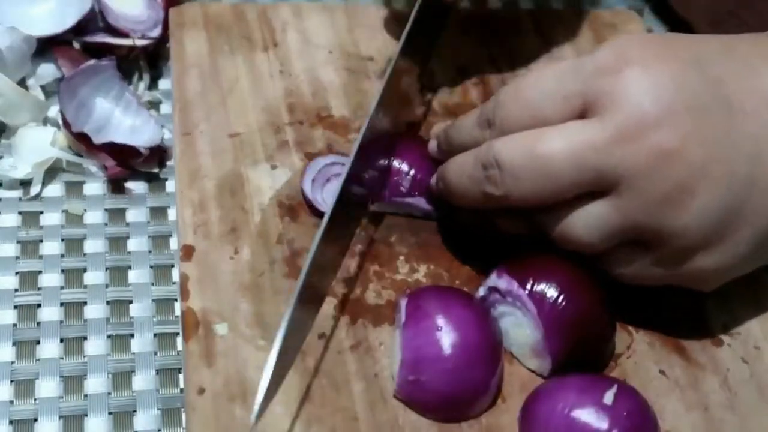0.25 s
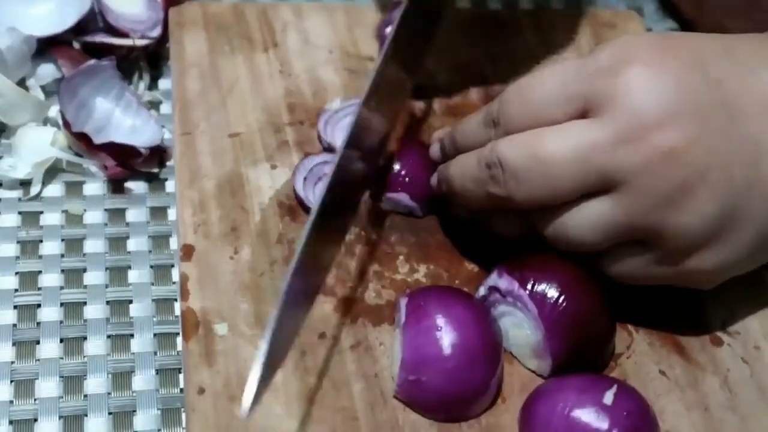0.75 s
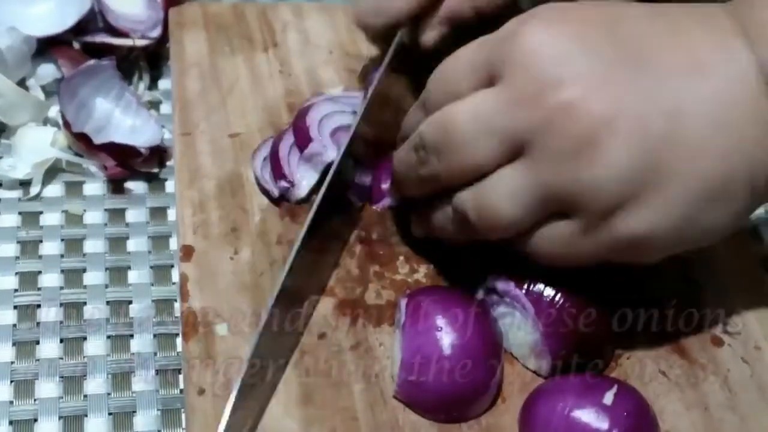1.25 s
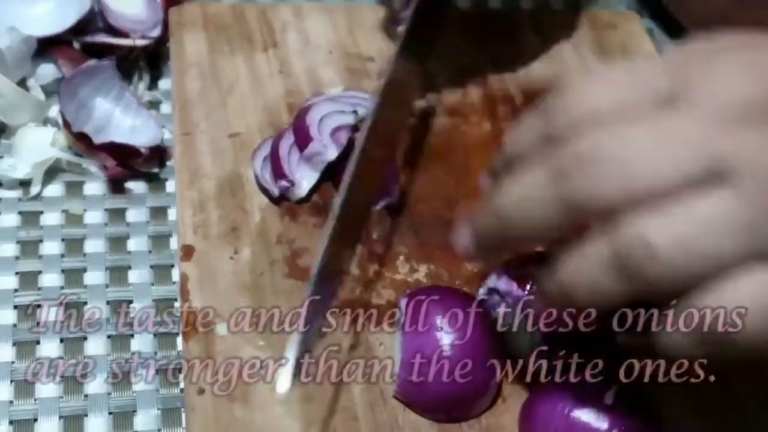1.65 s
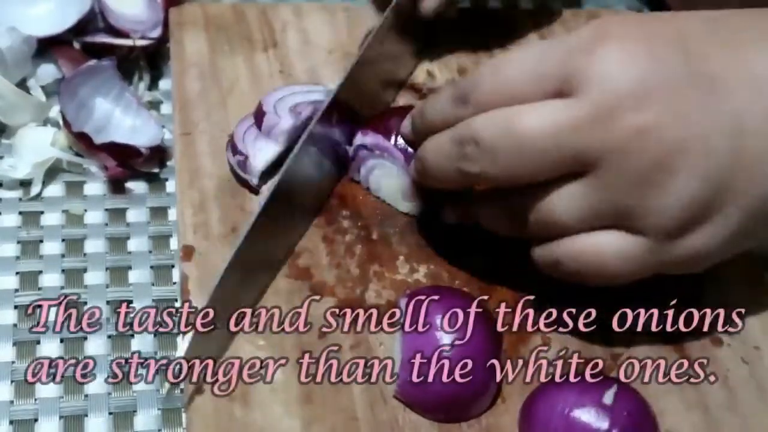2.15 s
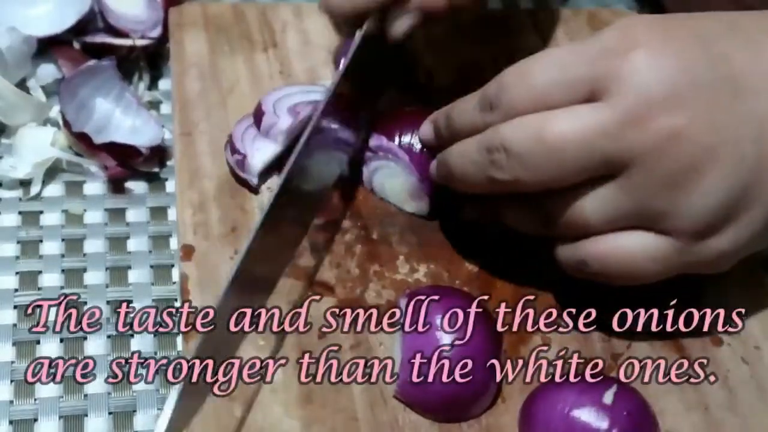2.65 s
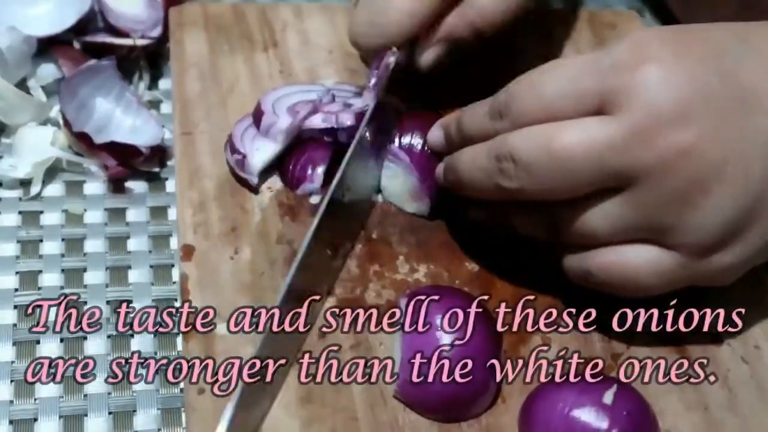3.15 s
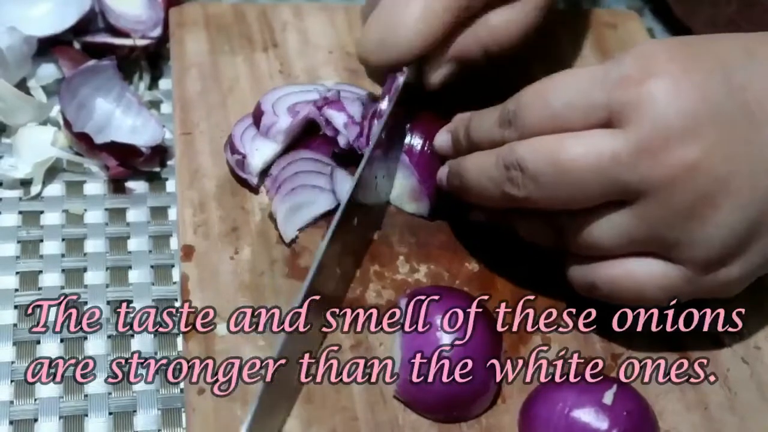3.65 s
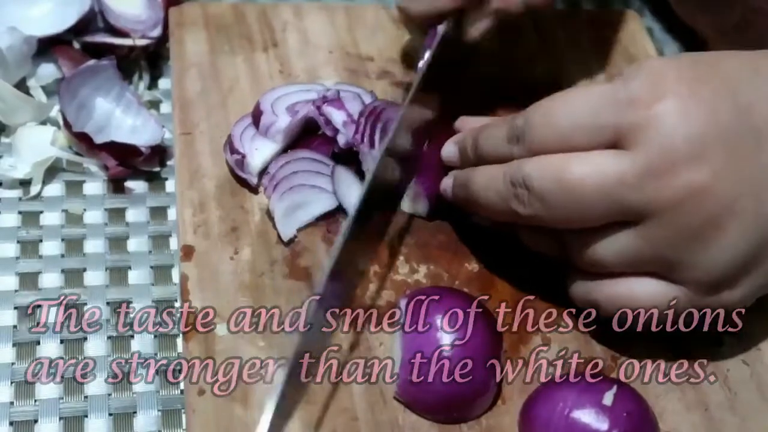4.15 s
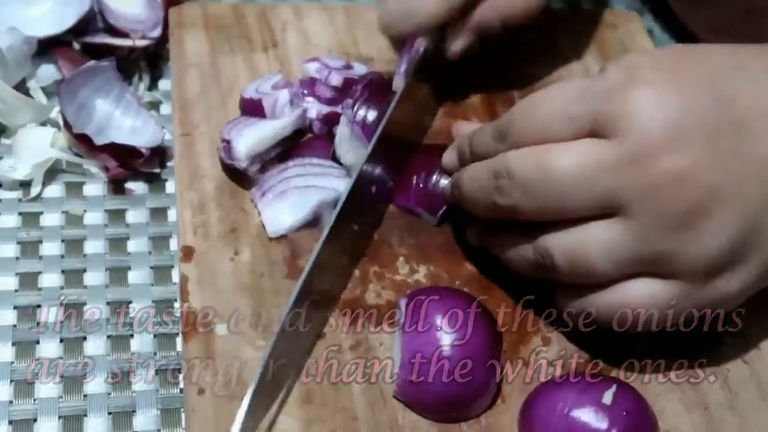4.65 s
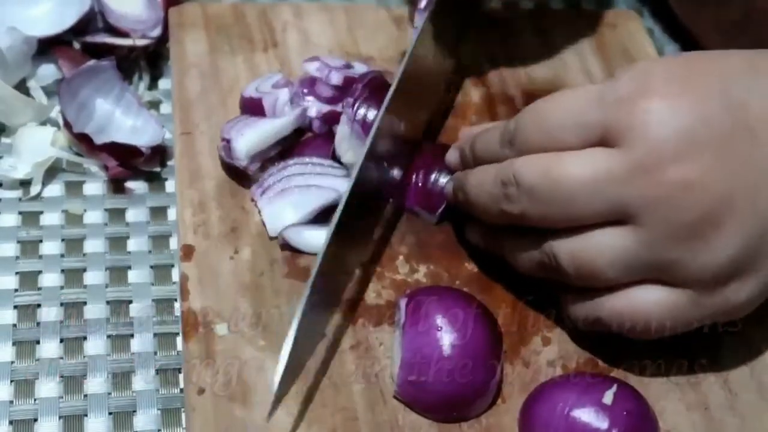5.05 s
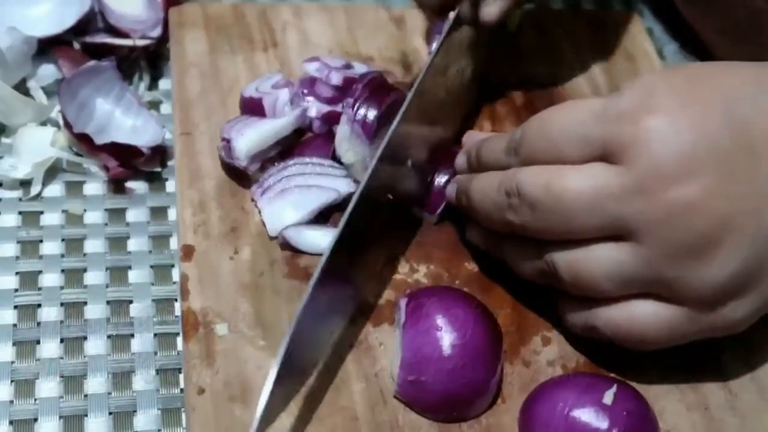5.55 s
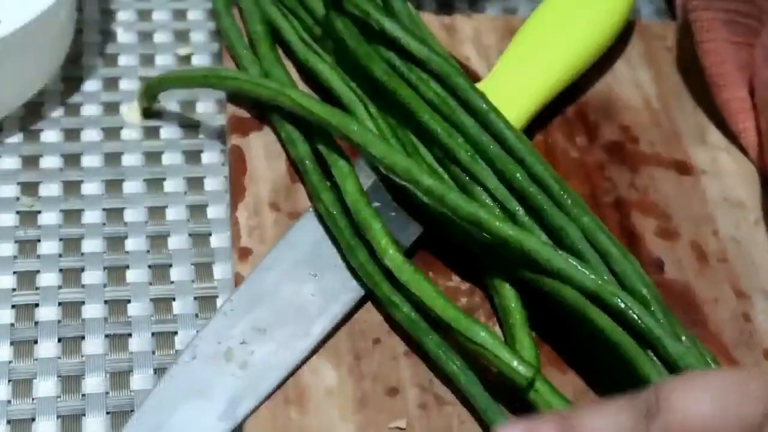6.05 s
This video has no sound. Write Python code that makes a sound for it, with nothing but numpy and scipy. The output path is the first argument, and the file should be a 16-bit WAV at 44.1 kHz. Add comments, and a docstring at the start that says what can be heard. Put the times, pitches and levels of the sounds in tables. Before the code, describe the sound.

A knife slices an onion on a wooden board, about three wet crunches and knocks a second, over a low room rumble.

```python
"""In a kitchen, close to the microphone, a knife slices an onion on a wooden board, about three cuts a second.
The blade crunches through wet flesh and snaps the layers, while its push makes the board thud.
Then the edge knocks on the wood and drags along it, which sets board and blade ringing.
A low room rumble and a soft hiss lie underneath, and the walls add a faint echo."""
import sys
import numpy as np
from scipy import signal
from scipy.fft import rfft, irfft
from scipy.io import wavfile
from scipy.ndimage import uniform_filter1d

SR = 44100
rng = np.random.default_rng(int(sys.argv[2]) if len(sys.argv) > 2 else 0)


def to_wav(s):
    """Save 16-bit WAV."""
    ch = np.atleast_2d(s).T  # columns
    pcm = np.round(np.clip(ch, -1, 1) * 32767)  # PCM
    wavfile.write(sys.argv[1], SR, pcm.astype(np.int16))


N = 277314
HZ = np.fft.rfftfreq(4096, 1 / SR)  # the pitches at which a tone colour is set


def amp(db):
    """Turns decibels into a number to multiply a sound by."""
    return 10 ** (np.asarray(db) / 20)


def evened(x):
    """Scales a sound to an average (rms) level of 1."""
    return x / np.sqrt(np.mean(x ** 2) + 1e-20)


def leveled(x, db, length):
    """Gives a sound the energy of the level db held for length seconds."""
    return amp(db) * x * np.sqrt(length * SR / np.sum(x ** 2))


def read(points, hz):
    """Looks up a pitch in a table, gliding between its rows."""
    pitches, values = np.transpose(points)
    return np.interp(np.log(hz + 1), np.log(pitches + 1), values)


def add(mix, start, sound):
    """Mixes a sound in, start seconds from the beginning."""
    part = mix[max(round(start * SR), 0):][:len(sound)]
    part += sound[:len(part)]


def colour(x, db):
    """Turns each pitch in HZ up or down by db, without smearing the sound back in time."""
    log_gain = np.log(amp(np.maximum(db, db.max() - 100)))
    mirrored = np.r_[log_gain, log_gain[-2:0:-1]]
    response = np.fft.ifft(np.exp(np.conj(signal.hilbert(mirrored)))).real
    return signal.fftconvolve(x, response)


def tilt(slope, low_hz=870, high_hz=4500):
    """A harder contact has more treble: a slope in dB per octave between two pitches."""
    return slope * np.log2(np.clip(HZ, low_hz, high_hz) / low_hz)


def bump(hz, db, octaves):
    """A smooth boost around one pitch, in dB."""
    return db * np.exp(-(np.log2((HZ + 1) / hz) / octaves) ** 2)


def grains(length, per_s, spread_db, fade_db, taper=0.17):
    """A short, fading run of tiny uneven clicks over a fine fizz."""
    n = max(int(length * SR), 64)
    chance, size, sign = rng.random((3, SR // 8))[:, :n]
    strength = amp(spread_db * np.minimum(-np.log(1 - size), 3))
    clicks = (chance < per_s / SR) * strength * np.sign(sign - .5)
    fizz = 0.027 * (sign - .5)
    fade = amp(-fade_db * np.linspace(0, 1, len(clicks)))
    return (clicks + fizz) * signal.windows.tukey(len(clicks), taper) * fade


# tone colour of the room noise: (pitch [Hz], level [dB])
NOISE_COLOUR = [(12, -68), (20, -23), (48, 4.5), (86, -11), (134, -5), (204, -6), (270, -2), (388, -12.5),
                (718, -12.5), (1000, -19.5), (1760, -24), (2320, -25.5), (2670, -26), (8650, -52.5),
                (16000, -73.5)]
# low notes the room hums at: (pitch [Hz], spread to each side [Hz], highest level [dB])
ROOM_HUMS = [(55, 7.7, -55.5), (156, 30, -45), (276, 25, -52.5)]
# the recorder turns the background noise down after many cuts, then lets it creep back:
# (time [s], level [dB])
RECORDER_NOISE_LEVEL = [(0, -55), (.95, -54.5), (1.4, -47), (1.8, -50.5), (2.32, -46.5), (2.46, -57),
                        (2.8, -46.5), (2.95, -54.5), (3.55, -55), (3.85, -51.5), (4.12, -51), (4.4, -50),
                        (4.85, -50.5), (5.08, -48.5), (5.4, -48), (5.56, -56), (5.84, -49), (6.29, -49.5)]
def room_noise(rumble_db=5, hiss_db=-2.0, split_hz=800, dip_db=-1.5, dip_after_s=0.14, dip_width_s=.06):
    """The room's steady rumble, hiss and hum, which the recorder turns down and back up at set times."""
    hz, t = np.fft.rfftfreq(N, 1 / SR), np.arange(N) / SR
    dips = sum(np.exp(-((t - start - dip_after_s) / dip_width_s) ** 2) for start, *_ in ONION_CUTS)
    level_db = np.interp(t, *np.transpose(RECORDER_NOISE_LEVEL)) + dip_db * dips
    noise = rfft(rng.standard_normal(N)) * amp(read(NOISE_COLOUR, hz))
    low_share = 1 / (1 + (hz / split_hz) ** 6)
    rumble = evened(irfft(noise * low_share, N)) * amp(rumble_db)
    hiss = evened(irfft(noise * (1 - low_share), N)) * amp(hiss_db)
    hum = np.zeros(N)
    for pitch, spread, db in ROOM_HUMS:
        band = rfft(rng.standard_normal(N)) / (1 + ((hz - pitch) / spread) ** 2)
        hum += amp(db) * evened(irfft(band, N))
    return (rumble + hiss) * amp(level_db) + hum * amp(level_db - level_db.max())


# how long the echo lasts: (pitch [Hz], time to fade by 60 dB [s])
ECHO_TIMES = [(100, 0.31), (1000, 0.17), (2300, 0.14), (3500, 0.17), (10000, 0.14)]
def wall_echo(x, dull_hz=2800, rise_s=0.0035):
    """The walls send back a dull echo in which each pitch dies at its own speed."""
    hz, t, noise = signal.stft(rng.standard_normal(SR // 2), SR, nperseg=256)
    fade = amp(-60 * t / read(ECHO_TIMES, hz)[:, None])
    treble_loss = 1 + (hz[:, None] / dull_hz) ** 6
    tail = signal.istft(noise * fade / treble_loss, SR, nperseg=256)[1]
    tail *= 1 - np.exp(-np.arange(len(tail)) / SR / rise_s)
    return signal.fftconvolve(x, tail / np.linalg.norm(tail))[:N]


def board_thuds(push_hz=76, bounce_hz=131, swell_turns=0.29, table_hz=46, table_db=-11, table_s=0.0086):
    """The board gives under each cut and landing and swings back; the table below sways more slowly."""
    out, t = np.zeros(N), np.arange(SR // 6) / SR
    sway = amp(table_db) * t / table_s * np.exp(1 - t / table_s) * np.sin(2 * np.pi * table_hz * t)
    # the board sags just after a cut begins, and bounces as the edge arrives
    pushes = [(start + 0.0083, db, push_hz) for start, _, _, _, db in ONION_CUTS]
    bounces = [(start - 0.0011, db, bounce_hz) for start, _, _, db, *_ in KNIFE_LANDINGS]
    for start, db, hz in pushes + bounces:
        swell = hz * t / swell_turns
        add(out, start, -amp(db) * swell * np.exp(1 - swell) * np.sin(2 * np.pi * hz * t))
        add(out, start - 0.0071, amp(db) * sway)
    return out


# the notes of board and blade: (pitch [Hz], level [dB], time to fade by 60 dB [s])
BOARD_NOTES = [(153.4, -17.5, 0.083), (306, -19.5, 0.065), (500, -18.5, 0.028), (883.5, -3, 0.039),
               (1005, -8.5, 0.04), (1127, -6.5, 0.035), (1320, -6, 0.019), (1448, -11.5, 0.025),
               (1637, -4, 0.018), (1888, -7.5, 0.033), (2093, -2.5, 0.021), (2247, 7.5, 0.015),
               (2386, 2.5, 0.0096), (2734, -6, 0.016), (3677, -4.5, 0.0082), (4730, -8, 0.0049),
               (5680, -15, 0.016), (6710, -15.5, 0.0097), (8260, -14, 0.0058), (10300, -25.5, 0.0098),
               (13100, -30, .008)]
def board_ring(rise_s):
    """Board and blade ring with many short notes; neighbouring notes swing in opposite directions."""
    t = np.arange(SR // 10) / SR
    ring = sum((-1) ** k * amp(db - 60 * t / fade_s) * np.sin(2 * np.pi * hz * t)
               for k, (hz, db, fade_s) in enumerate(BOARD_NOTES))
    return ring * (1 - np.exp(-t / rise_s))


# tone colour of the edge rubbing on wood: (pitch [Hz], level [dB])
RUB_COLOUR = [(100, 10), (900, -0.5), (2400, -2.5), (3000, -10), (4500, -12.5), (6000, -27.5),
              (12000, -33.5)]
def knife_drags(damping_db_per_s=400, lag_s=0.003014, extra_bright=1):
    """After each landing the edge sticks and slips on the wood, which keeps the board ringing."""
    out, ring = np.zeros(N), board_ring(rise_s=0.00077)
    ring *= amp(-damping_db_per_s * np.arange(len(ring)) / SR)
    for start, _, hardness, _, length, db, hz in KNIFE_LANDINGS:
        slips = grains(length, per_s=1700, spread_db=2.5, fade_db=8.0)
        scrape = signal.fftconvolve(slips, ring)
        tone = read(RUB_COLOUR, HZ) + tilt(hardness + extra_bright) + bump(hz, db=3.5, octaves=0.13)
        add(out, start + lag_s, leveled(colour(scrape, tone), db, length))
    return out


# the edge lands on the board, less hard when onion cushions it: (time [s], knock level [dB],
# hardness [dB per octave], thud level [dB], drag length [s], drag level [dB], pitch of that spot [Hz])
KNIFE_LANDINGS = [(.12, -24, -1.5, -30.5, 0.037, -32, 1400), (.458, -21, -1, -20.5, 0.041, -31, 1300),
                  (0.7429, -14.5, -3, -34.5, 0.033, -30, 1570), (1.0478, -10, -16, -24, 0.029, -25, 1010),
                  (1.3408, -8, -5.5, -20.5, 0.013, -38, 2200), (1.6315, 3, 0, -22.5, 0.033, -19, 2330),
                  (1.8178, -11, -9.5, -38, 0.011, -43.5, 910), (2.208, -33, -3.5, -47, 0.03, -34.5, 1430),
                  (2.379, -27, 3.5, -41, 0.036, -25, 2000), (2.685, -32, -17, -22.5, 0.041, -29.5, 970),
                  (2.884, -24, 0.5, -15, 0.042, -35, 1900), (3.2, 1, 3.5, -35, 0.0037, -37.5, 2200),
                  (3.4664, 8, 0.5, -18.5, .005, -25, 2250), (3.7213, -17.5, -27.5, -16, 0.023, -49, 874),
                  (3.968, 7.5, 2.5, -29.5, 0.017, -10, 2340), (4.268, -20, -17, -34.5, 0.021, -27, 980),
                  (4.605, -13, -5.5, -34, 0.03, -28, 1514), (4.753, 1, -10.5, -16, 0.021, -20.5, 1087),
                  (4.9668, -6, -17.5, -13.5, 0.028, -29, 950),
                  (5.497, -27.5, -14.5, -43, 0.049, -39.5, 1120), (5.739, -9, -3, -19, .004, -33.5, 1720)]
def knife_knocks(bite_db=-15, fizz_s=0.0049, fizz_lead_s=0.0029, fizz_db=-34, fizz_bright=7.1):
    """The edge strikes the board and bites into the wood; a brief, faint fizz comes just before."""
    out, ring = np.zeros(N), board_ring(rise_s=0.0012)
    t = np.arange(len(ring)) / SR
    for start, db, hardness, _, drag_s, _, hz in KNIFE_LANDINGS:
        fizz = flesh_crunch(fizz_s, hardness + fizz_bright)
        add(out, start - fizz_lead_s, leveled(fizz, db + fizz_db, fizz_s))
        bite = grains(0.0081, per_s=5200, spread_db=19.0, fade_db=30.0)
        bite = colour(bite, read(FLESH_COLOUR, HZ) + tilt(1.1, high_hz=14000))
        damping_db_per_s = 201 + 2001 * np.exp(-drag_s / 0.0037)  # a blade stopping dead chokes the ring
        knock = ring * amp(-damping_db_per_s * t)
        knock /= abs(knock).max()
        add(knock, 0, amp(bite_db) * bite / abs(bite).max())
        knock = colour(knock, tilt(hardness, high_hz=7000) + bump(hz, db=2.5, octaves=0.18))
        add(out, start, amp(db) * knock / abs(knock).max())
    return out


# tone colour of breaking onion: (pitch [Hz], level [dB])
FLESH_COLOUR = [(60, 13), (280, 3), (500, -7), (720, -6), (890, 10), (1350, -4.5), (2250, 4.5),
                (2650, -3.5), (3600, -5), (4600, -12), (6800, -20.5), (9000, -29.5), (13000, -40),
                (16000, -78.5)]
def flesh_crunch(length, bright, clump_db=6, clump_s=0.0043, cell_hz=3800, cell_db=5, patch_db=5):
    """Onion cells burst in clumps; four patches of flesh each crackle with a colour of their own."""
    out = 0
    for hz in cell_hz * 2 ** rng.uniform(-.3, .3, 4):
        cells = grains(length, per_s=800, spread_db=1.5, fade_db=9.5, taper=0.34)
        clumps, ripples = np.clip(rng.standard_normal((2, 40)), -1.5, 1.5)
        t = np.arange(len(cells)) / SR
        cells *= amp(clump_db * np.interp(t / clump_s, np.arange(len(clumps)), clumps))
        patch = patch_db * np.interp(HZ, np.linspace(0, HZ[-1], len(ripples)), ripples)
        patch *= np.minimum(HZ / cell_hz, 1)  # patches differ mostly in the treble
        tone = read(FLESH_COLOUR, HZ) + tilt(bright) + bump(hz, db=cell_db, octaves=0.17)
        out = out + colour(cells, tone + patch)
    return out


def layer_crack(db, bright, pitch_hz=3444, snap_s=0.0026, splinter_db=-12):
    """A breaking layer makes one sharp click with a few splinters."""
    splinters = grains(.007, per_s=5400, spread_db=-0.5, fade_db=14.5)
    burst = amp(splinter_db) * splinters / abs(splinters).max()
    burst[0] += .6  # the click
    tone = read(FLESH_COLOUR, HZ) + tilt(bright) + bump(pitch_hz, db=10.5, octaves=0.44)
    return leveled(colour(burst, tone), db, snap_s)


# a thick layer breaks: (time [s], level [dB], brightness [dB per octave])
LAYER_SNAPS = [(.438, -25, -5), (.459, -20, -2.5), (1.0229, -30, -2), (1.041, -31, -3.5),
               (1.340, -17.5, -1), (1.8197, -29, -5), (2.6646, -22, -4), (2.869, -19.5, 4),
               (2.8845, -13.5, -0.5), (2.898, -22, -7), (3.175, -17.5, -0.5), (3.682, -24.5, -2),
               (3.711, -25.5, -2.5), (3.936, -23, -1), (4.2464, -22.5, -1.5), (4.949, -15, -4),
               (5.2445, -17.5, -.5), (5.2488, -17.5, 0.5), (5.4871, -11.5, 0.5), (5.7393, -19.5, 2.5),
               (5.758, -16, 1)]
# the blade goes through the flesh:
# (time [s], length [s], level [dB], brightness [dB per octave], push on the board [dB])
ONION_CUTS = [(0.088, 0.047, -33.5, -1.5, -31), (0.433, 0.045, -33.5, 0.5, -22),
              (0.704, 0.049, -36, 0, -38), (1.018, 0.069, -46.5, 4.5, -26), (1.32, 0.04, -30, -3, -38),
              (1.581, 0.054, -41.5, 1.5, -38), (2.2, 0.051, -44.5, 6, -44), (2.355, 0.032, -33.5, 2, -34.5),
              (2.655, 0.045, -34.5, 4.5, -22), (2.866, 0.036, -31, 5, -20.5), (3.17, .042, -28, 4, -30),
              (3.405, 0.048, -34, 1, -28), (3.681, 0.065, -34.5, -0.5, -28.5),
              (3.923, .06, -31, -0.5, -24.5), (4.21, 0.069, -34, -0.5, -29.5),
              (4.74, 0.031, -28, -2, -36.5), (4.943, .039, -31, 3, -43), (5.22, 0.059, -36, 1.5, -28.5),
              (5.456, 0.043, -31.5, 0, -30), (5.741, 0.021, -29.5, 1, -28)]
def onion_cuts(prick_s=0.0088, prick_lead_s=.021, prick_db=-17.5, juice_db=-21, juice_s=0.035):
    """The edge pricks the skin, the flesh crunches, layers break, and the wet faces crackle on."""
    out = np.zeros(N)
    for start, length, db, bright, _ in ONION_CUTS:
        prick = flesh_crunch(prick_s, bright + 2)
        add(out, start - prick_lead_s, leveled(prick, db + prick_db, prick_s))
        add(out, start, leveled(flesh_crunch(length, bright), db, length))
        for _ in range(2):  # two thin layers give way at random moments
            moment = start + rng.uniform(0, length)
            add(out, moment, layer_crack(db + rng.uniform(-1.5, 4.5), bright))
        juice = grains(juice_s, per_s=500, spread_db=4.0, fade_db=9.0, taper=.1)
        juice = colour(juice, read(FLESH_COLOUR, HZ) + tilt(3.2))
        add(out, start + length, leveled(juice, db + juice_db, juice_s))
    for start, db, bright in LAYER_SNAPS:
        add(out, start, layer_crack(db, bright))
    return out


# how wide the room sounds; low notes are alike on both sides: (pitch [Hz], side level against middle [dB])
ROOM_WIDTH = [(60, -38.5), (110, -27.5), (200, -24), (380, -7.5), (700, -13.5), (1290, -8), (2380, -9.5),
              (4400, 0.5), (8120, 4), (15000, -4)]
def scene(echo_db=-21, left_delay_s=.00002):
    """The slicing reaches the microphone's right side first; the room sound comes from all around."""
    hz = np.fft.rfftfreq(N, 1 / SR)
    slicing = onion_cuts() + knife_knocks() + knife_drags() + board_thuds()
    delayed = irfft(rfft(slicing) * np.exp(-2j * np.pi * hz * left_delay_s), N)
    middle = amp(echo_db) * wall_echo(slicing) + room_noise()
    side = amp(echo_db) * wall_echo(slicing) + room_noise()
    side = irfft(rfft(side) * amp(read(ROOM_WIDTH, hz)), N)
    return np.array([delayed + middle + side, slicing + middle - side])


def record(dry, threshold_db=-17, duck_share=0.53, recover_db_per_s=70, react_s=0.012, top_hz=15800):
    """Hard knocks overload the input, which briefly turns itself down; the highest treble is cut off."""
    t = np.arange(N) / SR
    power = uniform_filter1d((dry ** 2).mean(0), size=130)
    power_db = 10 * np.log10(abs(power) + 1e-12)
    held_db = np.maximum.accumulate(power_db + recover_db_per_s * t) - recover_db_per_s * t
    over_db = uniform_filter1d(np.maximum(held_db - threshold_db, 0), size=400)
    ducked = dry * amp(-duck_share * np.interp(t - react_s, t, over_db))
    limited = ducked / (1 + ducked ** 10) ** (1 / 10)  # rounds off the tallest peaks
    treble_cut = signal.firwin(255, top_hz, window=("kaiser", 9), fs=SR)
    return signal.oaconvolve(limited, treble_cut[None], "same")


dry = scene()
out = record(dry)
to_wav(out)
```